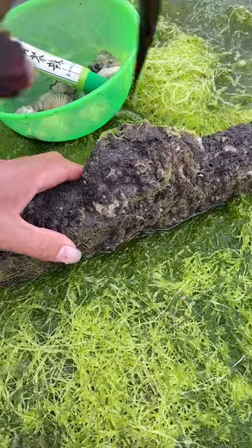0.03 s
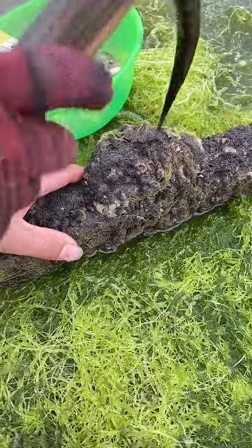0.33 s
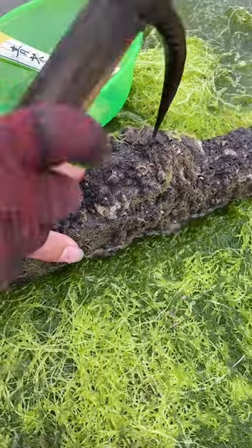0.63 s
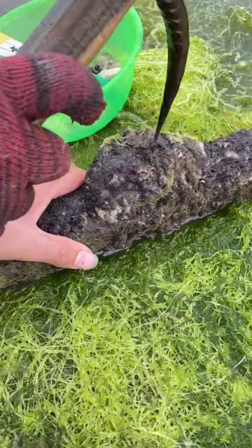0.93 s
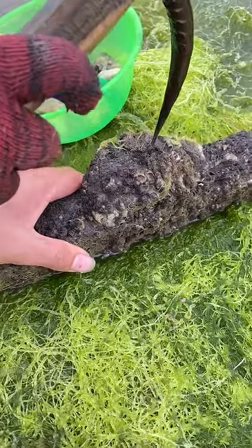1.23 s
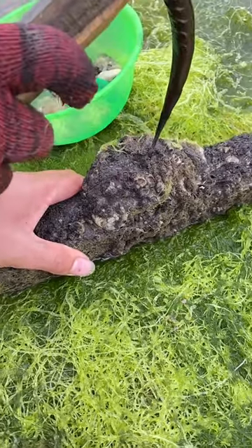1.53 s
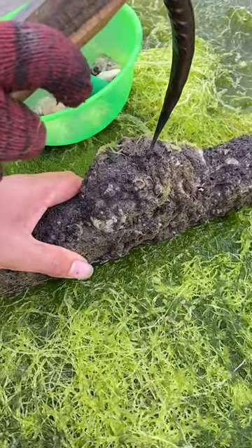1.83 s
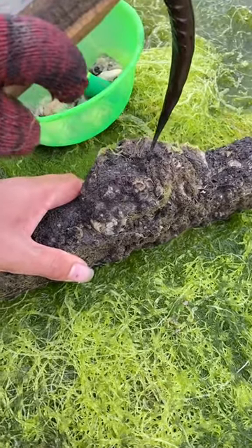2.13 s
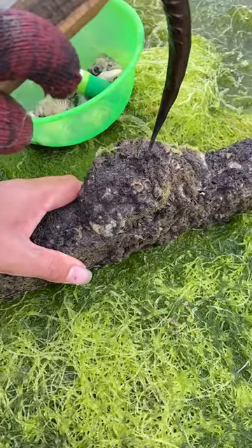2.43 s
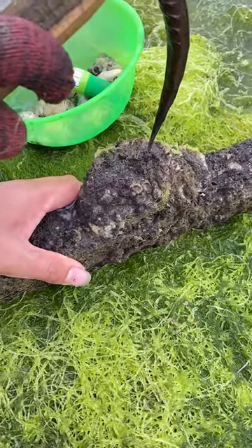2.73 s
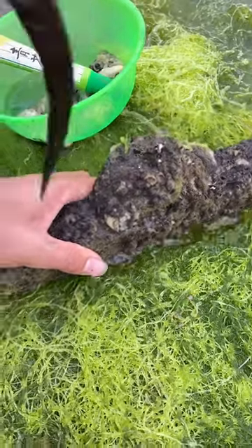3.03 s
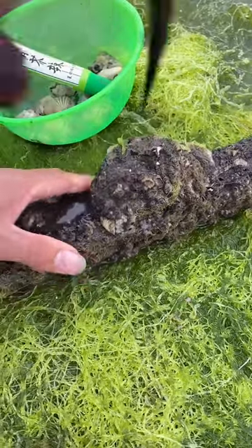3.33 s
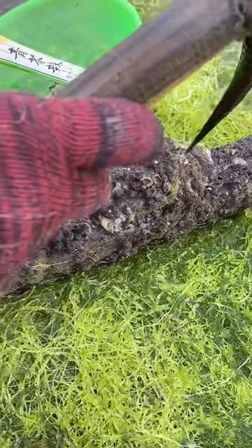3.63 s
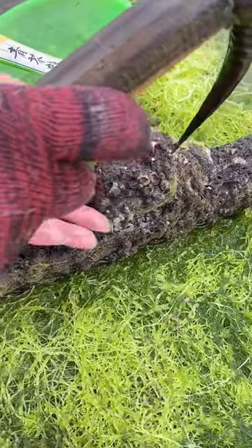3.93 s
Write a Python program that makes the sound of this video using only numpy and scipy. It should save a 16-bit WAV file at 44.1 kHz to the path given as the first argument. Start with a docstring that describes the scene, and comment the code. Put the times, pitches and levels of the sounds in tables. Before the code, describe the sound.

A metal pick knocks twice on an oyster-crusted rock, the second blow sharp and loud, then pries with small shell cracks. Clothing rustles near the microphone, with one loud rub before a last click, over low outdoor wind.

```python
"""On an oyster-crusted rock in the open air, a metal pick knocks twice and levers at the shells.
Each impact excites damped modes of pick, shell and rock; the crust fractures in small cracks.
Clothing rustles by friction close to the microphone. Near three seconds the arm pulls back with
a loud stick-slip rub; then the tip clicks on shell again. Soft handling bumps and low wind lie beneath."""
import sys
import numpy as np
from scipy import signal
from scipy.fft import rfft, irfft
from scipy.io import wavfile
from scipy.ndimage import uniform_filter1d

SR = 44100
rng = np.random.default_rng(int(sys.argv[2]) if len(sys.argv) > 2 else 0)


def unload_audio(sound):
    """Save the sound as a 16-bit wav file, at the path given as the first command line argument."""
    columns = np.transpose(np.atleast_2d(sound))
    # keep every value between -1 and 1, then stretch to whole-number steps
    steps = np.round(np.clip(columns, -1, 1) * 32767)
    wavfile.write(sys.argv[1], SR, steps.astype(np.int16))


N = 176400
T = np.arange(N) / SR

# spectrum of breaking shell (f/Hz, gain/dB)
FRACTURE_SPECTRUM = [(150, 18), (600, 6), (1300, -1), (2200, -14.5), (3500, -7.5), (6000, -23),
                     (9000, -26.5), (15000, -43)]


def undb(db):
    """Amplitude ratio of a level in decibels."""
    return 10 ** (np.asarray(db) / 20)


def unit(x):
    """Normalisation to rms 1."""
    return x / np.sqrt(np.mean(x ** 2))


def curve(rows, column):
    """Linear interpolation of one table column over time."""
    rows = np.array(rows)
    return np.interp(T, rows[:, 0], rows[:, column])


def colour(x, spectrum):
    """Minimum-phase filter through (f/Hz, gain/dB) points, made causal by folding the cepstrum."""
    points = np.array(spectrum)
    hz = np.maximum(np.arange(N // 2 + 1) * SR / N, 1)
    gain_db = np.interp(np.log(hz), np.log(points[:, 0]), points[:, 1])
    cepstrum = irfft(np.log(undb(gain_db)), N)
    cepstrum[1:N // 2] *= 2
    cepstrum[N // 2 + 1:] = 0
    return irfft(rfft(x, N) * np.exp(rfft(cepstrum)), N)


def band(x, lo_hz, hi_hz=SR / 2 - 1000):
    """Band-pass filtering, normalised to rms 1."""
    return unit(signal.sosfilt(signal.butter(3, [lo_hz, hi_hz], "band", fs=SR, output="sos"), x))


def wander(rate):
    """Smooth random modulation of rms 1."""
    hold = max(int(SR / rate), 2)
    steps = rng.standard_normal(N)[np.arange(N) // hold]
    return unit(uniform_filter1d(steps, hold))


def grains(per_s, spread_db):
    """Shot noise: dense, tiny contacts of uneven size."""
    contacts = rng.random(N) < per_s / SR
    return unit(contacts * rng.standard_normal(N) * undb(spread_db * rng.standard_normal(N)))


def decay(t60):
    """A quarter second of exponential decay, falling 60 dB in t60 seconds."""
    return np.exp(-np.log(1000) * T[:SR // 4] / t60)


def ring(modes):
    """Free vibration as a sum of damped modes."""
    return sum(undb(db) * decay(t60) * np.sin(2 * np.pi * hz * T[:SR // 4]) for hz, db, t60 in modes)


def burst(t60):
    """Exponentially decaying white noise."""
    return decay(t60) * rng.standard_normal(SR // 4)


def add(out, s, x):
    """Superpose x on out from s seconds onward."""
    i = int(s * SR)
    out[i:i + len(x)] += x[:N - i]


def wind():
    """Turbulence at the microphone gives a low rumble, over the faint, even hiss of open air."""
    # strength of the rumble (t/s, level/dB)
    gusts = [(0.15, -43), (0.3, -47), (0.6, -49), (0.78, -42), (0.95, -46), (1.5, -44), (1.85, -41),
             (2.3, -40), (2.6, -36), (2.95, -36.5), (3.08, -30), (3.22, -34), (3.45, -42), (3.6, -42),
             (3.8, -48), (3.99, -50)]
    # spectra of the rumble and the hiss (f/Hz, gain/dB)
    rumble_spectrum = [(15, 0.5), (28, 2), (55, 2), (90, -5.5), (160, -23), (500, -55), (4000, -110)]
    air_spectrum = [(200, 13), (1000, -5), (3000, -6.5), (7000, 0), (11000, -0.5), (15500, -3)]
    rumble = unit(colour(rng.standard_normal(N), rumble_spectrum)) * undb(curve(gusts, 1))
    hiss = unit(colour(rng.standard_normal(N), air_spectrum)) * undb(-65.5)
    return rumble + hiss


def handling_bumps():
    """Heavy damping limits each thump of handling to about one cycle of low vibration."""
    # thumps (t/s, level/dB, f/Hz)
    thumps = [(0.258, -18.5, 87), (0.8052, -9.5, 184), (0.963, -22.5, 186), (1.092, -21, 173),
              (1.138, -22, 188), (1.251, -21.5, 118), (1.582, -11.5, 200), (1.699, -19.5, 210),
              (1.775, -22.5, 124), (2.123, -20.5, 163), (2.292, -19, 200), (2.396, -20, 148),
              (2.444, -20.5, 94), (3.018, -20.5, 70), (3.0582, -8, 360), (3.068, -6, 64), (3.076, -6, 90),
              (3.212, -12.5, 99), (3.2782, -11, 168), (3.36, -16, 210), (3.375, -14.5, 154),
              (3.555, -13, 111), (3.712, -17, 266), (3.715, -22, 74.4)]
    out = np.zeros(N)
    for s, db, hz in thumps:
        cycles = T[:SR // 10] * hz
        attack = 1 - np.exp(-cycles / 0.24)
        release = np.exp(-2 * (cycles / 1.086) ** 2)
        add(out, s, undb(db) * np.sin(2 * np.pi * cycles) * attack * release)
    return out


def clothing_rustle():
    """Friction of many fibres, as the arm works, sums to a low flutter and a fine hiss."""
    # relative band levels (t/s, low/dB, middle/dB, treble/dB)
    levels = [(0.15, -39.5, -44.5, -51), (0.22, -35.5, -48, -51.0), (0.3, -39, -46.5, -54),
              (0.4, -43.5, -52, -56), (0.6, -43, -52.5, -55.5), (0.74, -35, -46.0, -46.5),
              (0.84, -44.5, -53, -58), (0.97, -35.5, -40.5, -39.5), (1.06, -38.5, -47, -50),
              (1.11, -35.5, -42, -44.5), (1.18, -43.5, -47.5, -50.0), (1.22, -33, -43.5, -47.5),
              (1.35, -44, -49, -56.5), (1.41, -33, -41.5, -49), (1.47, -34, -49, -54.0),
              (1.54, -43, -41.5, -50.5), (1.62, -31, -41.5, -49), (1.67, -38, -43.0, -52.0),
              (1.71, -36.0, -42.0, -48.5), (1.76, -35.5, -41, -52.0), (1.84, -33.5, -41.5, -50.5),
              (1.93, -34.5, -45, -52.5), (1.98, -34.5, -39, -48.5), (2.09, -36.5, -42, -49.5),
              (2.19, -36.5, -43.5, -47.0), (2.34, -36, -46.5, -52.0), (2.39, -38, -37, -49.5),
              (2.48, -36.5, -43.5, -46.5), (2.53, -46, -48, -56), (2.62, -38, -49, -54),
              (2.68, -39.5, -46, -55.5), (2.73, -47, -50, -55), (2.77, -36.5, -38.5, -46.5),
              (2.81, -37.5, -48.5, -54.5), (2.88, -38.0, -39, -45.5), (2.95, -40.5, -50, -57.5),
              (3.02, -37, -40, -41), (3.27, -32.5, -46, -46.0), (3.38, -33.5, -41, -43.0),
              (3.54, -34, -43.5, -47.5), (3.66, -42, -51.0, -53), (3.78, -42, -54.5, -56.5),
              (3.99, -43.5, -52.5, -58.0)]
    # spectrum of shifting fabric (f/Hz, gain/dB)
    spectrum = [(70, 0), (125, 1), (200, -3.5), (340, -5.5), (770, -13.5), (1200, -17), (2600, -26.5),
                (4600, -32), (7500, -38), (10000, -44.5), (12500, -49), (15500, -57)]
    low = band(colour(grains(per_s=2500, spread_db=3.0), spectrum), 71, 510)
    middle = band(colour(grains(per_s=5000, spread_db=1.5), spectrum), 418, 2560)
    treble = band(colour(grains(per_s=16000, spread_db=-0.5), spectrum), lo_hz=2580)
    fabric = sum(x * undb(curve(levels, k) - 2.5) for k, x in enumerate((low, middle, treble), 1))
    flutter_db = 1.6 * wander(rate=90)
    return undb(flutter_db) * fabric


def fabric_swishes():
    """Quick, light sliding friction gives a bright hiss under Gaussian envelopes."""
    # slides (t/s, half-width/s, level/dB)
    slides = [(0.185, .05, -57.5), (0.455, 0.022, -54.5), (0.56, 0.027, -60), (0.735, 0.05, -52),
              (0.987, 0.04, -50.5), (3.016, 0.0082, -46)]
    # spectrum of sliding fabric (f/Hz, gain/dB)
    spectrum = [(1000, -39), (4000, -4), (7500, 3), (11000, 0.5), (15500, -11)]
    swell = sum(undb(db) * np.exp(-((T - s) / width) ** 2) for s, width, db in slides)
    return swell * unit(colour(grains(per_s=13000, spread_db=0.5), spectrum))


def arm_rub():
    """Stick-slip friction: the rub catches and releases ever faster, then slides off in a gritty hiss."""
    # relaxation oscillation (t/s, slip rate f/Hz, level/dB)
    stick_slip = [(3.0, 146, -48), (3.06, 183, -26), (3.122, 210, -23.5), (3.134, 228, -10.5),
                  (3.155, 240, -15.5), (3.17, 300, -15.5), (3.185, 360, -28), (3.205, 410, -43),
                  (3.23, 420, -66)]
    # relative band levels of the friction noise (t/s, middle/dB, treble/dB)
    grit_levels = [(2.98, -67, -66), (3.018, -34, -37.5), (3.04, -41, -42.5), (3.1, -29, -34),
                   (3.11, -33.5, -48), (3.134, -28.5, -30), (3.146, -23.5, -28), (3.182, -15.5, -18.5),
                   (3.2, -26.5, -17), (3.216, -39, -35.5), (3.232, -47, -35), (3.242, -39, -45),
                   (3.26, -51, -47)]
    # spectra of the judder and the friction noise (f/Hz, gain/dB)
    judder_spectrum = [(60, -8), (150, 6), (240, 0.5), (400, -3), (650, -10.5), (1000, -36), (3000, -20),
                       (10000, -68)]
    grit_spectrum = [(180, -45), (300, -12), (337, 3), (641, -6.5), (821, -11), (1160, -10.5), (1460, -15),
                     (1640, -13.5), (1940, -16), (5390, -21), (15500, -44.5)]
    slip_hz = curve(stick_slip, 1) * np.exp(.09 * wander(rate=250))
    cycles = np.cumsum(slip_hz) / SR
    slips = np.diff(np.floor(cycles), prepend=0) * undb(0.91 * wander(rate=350))
    force = .5 * rng.standard_normal(N) - unit(slips - slips.mean())
    judder = unit(colour(force, judder_spectrum)) * undb(curve(stick_slip, 2))
    surge = unit(.8 + np.exp(-(cycles % 1) / .35))  # more grit just after each slip
    middle = band(colour(surge * grains(per_s=3500, spread_db=2.5), grit_spectrum), 620, 2150)
    middle *= undb(curve(grit_levels, 1) + 1.3)
    treble = band(colour(surge * grains(per_s=7000, spread_db=0.0), grit_spectrum), 2260, 13800)
    treble *= undb(curve(grit_levels, 2) - 0.95)
    start_s, end_s = grit_levels[0][0], grit_levels[-1][0]
    touching = uniform_filter1d(1. * (T > start_s) * (T < end_s), SR // 50)
    return touching * (judder + middle + treble)


def crumbs(start_s=1.5, end_s=3, per_s=24):
    """Grit gives way under the point in faint ticks, timed as a Poisson process."""
    breaks = (rng.random(N) < per_s / SR) * (T > start_s) * (T < end_s)
    impulses = breaks * undb(-36.5 + 9.2 * rng.random(N))
    ticks = signal.fftconvolve(impulses, burst(t60=.008))[:N]
    return colour(ticks, FRACTURE_SPECTRUM)


def shell_cracks():
    """Brittle fracture: shell under the lever releases its strain in an impulse, then crumbles."""
    # fractures (t/s, relative level/dB)
    fractures = [(0.356, -33), (0.805, -31), (1.391, -42), (1.584, -44), (1.6007, -20.5), (1.967, -27),
                 (2.3991, -19.5), (2.4398, -16), (2.531, -29), (2.756, -35), (3.0005, -38), (3.013, -28),
                 (3.019, -27), (3.035, -20), (3.242, -34), (3.381, -20.5)]
    out = np.zeros(N)
    for s, db in fractures:
        snap = burst(t60=0.018)
        snap[0] += 6  # the first break stands out of the crumbling
        add(out, s, undb(db) * snap)
    return colour(out, FRACTURE_SPECTRUM)


def tip_click(s=3.7098, db=-20, top_hz=11300):
    """After an instant of skidding, a light impact on shell excites high, short-lived modes."""
    # modes of the tip on shell (f/Hz, relative level/dB, T60/s)
    tip_modes = [(3460, -6, 0.012), (3650, -8, 0.013), (6020, -2.5, 0.0065), (7350, -12, .007),
                 (8500, -11, .009), (9400, -3, .005), (10100, -5, 0.006)]
    out = np.zeros(N)
    add(out, s - .0018, undb(db - 8.5) * burst(t60=0.027))
    add(out, s, undb(db) * ring(tip_modes))
    return signal.sosfilt(signal.butter(4, top_hz, fs=SR, output="sos"), out)


def pick_blows(bite_s=.00055, rock_lag_s=0.00177, low_cut_hz=280):
    """Impact rings pick and shell with a crunch, then the rock; longer contact gives a duller sound."""
    # blows (t/s, level/dB, relative rock level/dB, crunch gain/dB, contact time/ms, frequency ratio)
    impacts = [(0.3111, -14.5, 9, -4.5, 0.11, 0.892), (0.668, 1, 0, -10.5, 0.034, 0.98)]
    # modes of pick and shell, scaled by each blow (f/Hz, level/dB, T60/s)
    shell_modes = [(2020, -13, .018), (2290, -1, .013), (2560, -4, .010), (2870, -1, .015),
                   (4250, -19, .012), (5020, -14, .012), (5400, -15, .014), (6280, -20, .013),
                   (7400, -24, .012), (8230, -14, .012), (10000, -20, .007)]
    # modes of the rock beneath (f/Hz, relative level/dB, T60/s)
    rock_modes = [(390, -6, 0.017), (582, -9.5, 0.023), (705, -21.5, 0.046), (966, -26, 0.057)]
    # spectrum of crushed crust (f/Hz, gain/dB)
    crunch_spectrum = [(300, -10), (900, 6), (1400, -31), (2100, -27), (2900, 13), (3400, -7), (5000, -1),
                       (6500, -3.5), (8500, -8), (11000, -8), (15500, -24)]
    out = np.zeros(N)
    rock = ring(rock_modes)
    bite = 1 - np.exp(-(T[:len(rock)] / bite_s) ** 2)  # onset as the tip sinks in
    for s, db, rock_db, crunch_db, contact_ms, ratio in impacts:
        shell = ring([(hz * ratio, level, t60) for hz, level, t60 in shell_modes])
        crunch = colour(burst(t60=.026), crunch_spectrum)[:len(shell)]
        strike = bite * (shell + undb(crunch_db) * crunch)
        pole = np.exp(-1000 / (contact_ms * SR))  # the contact acts as a low-pass filter
        add(out, s, undb(db) * signal.lfilter([1 - pole], [1, -pole], strike))
        add(out, s + rock_lag_s, undb(db + rock_db) * bite * rock)
    return signal.sosfilt(signal.butter(4, low_cut_hz, "high", fs=SR, output="sos"), out)


def scene():
    """Superposition of the direct sound of all sources in one channel."""
    pick = pick_blows() + tip_click() + shell_cracks() + crumbs()
    return (pick + handling_bumps() + clothing_rustle() + fabric_swishes() + arm_rub() + wind())[None]


def record(dry):
    """Clipping just under full scale, a moment of silence at first, and band limiting."""
    peak, start_s, top_hz = .95, .15, 15800
    clipped = np.clip(dry, -peak, peak) * (T > start_s)
    return signal.sosfilt(signal.ellip(10, .2, 80, top_hz, fs=SR, output="sos"), clipped)


dry = scene()
out = record(dry)
unload_audio(out)
```